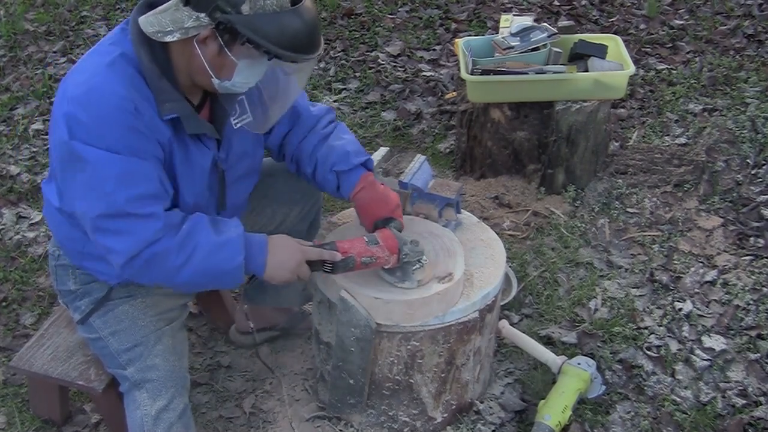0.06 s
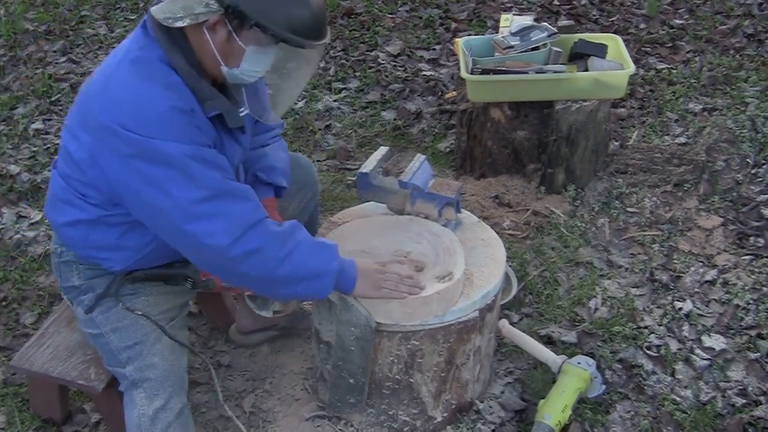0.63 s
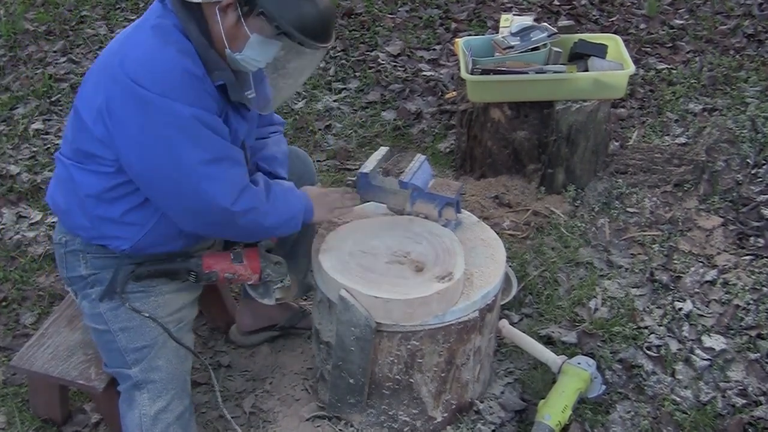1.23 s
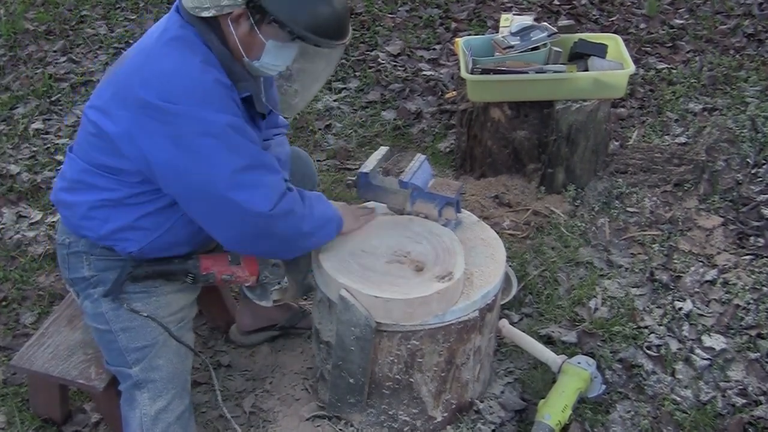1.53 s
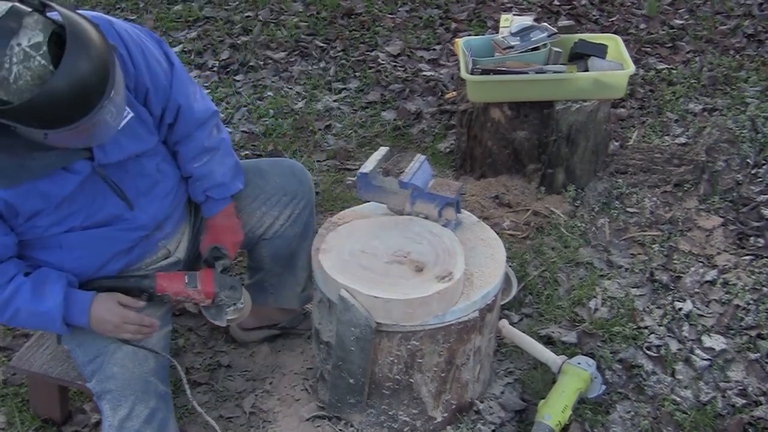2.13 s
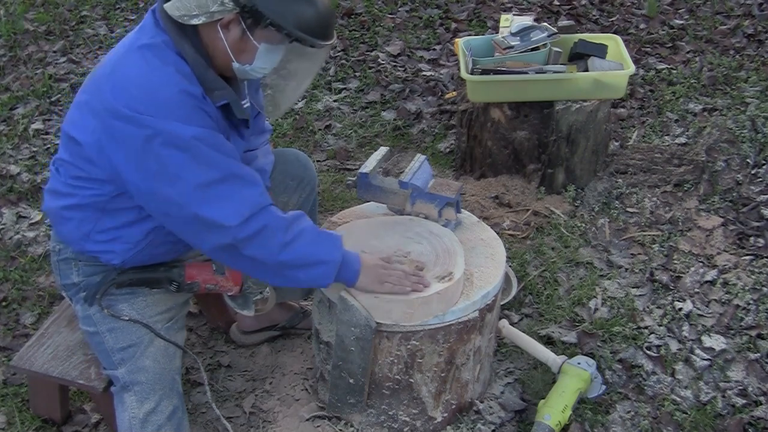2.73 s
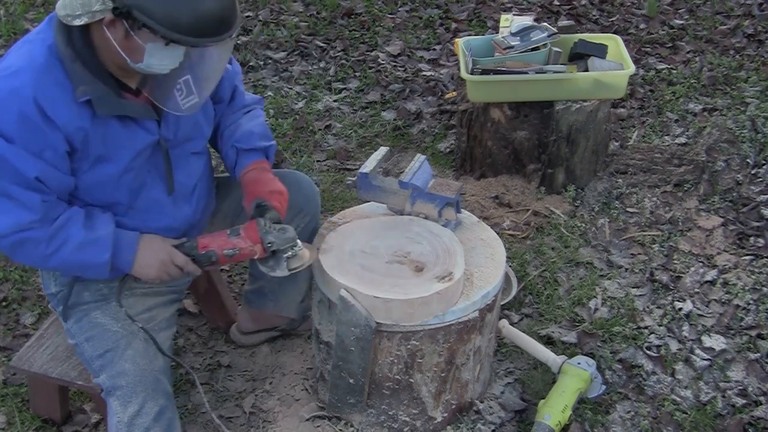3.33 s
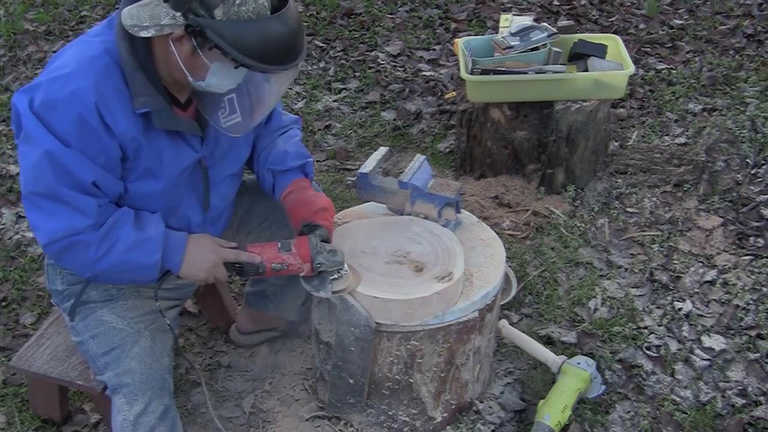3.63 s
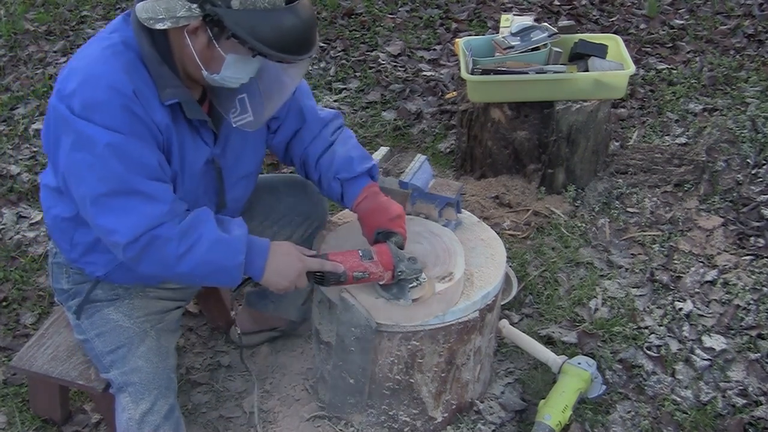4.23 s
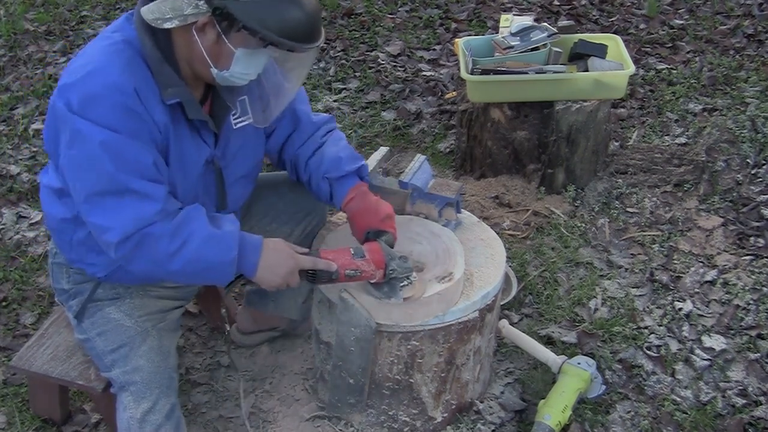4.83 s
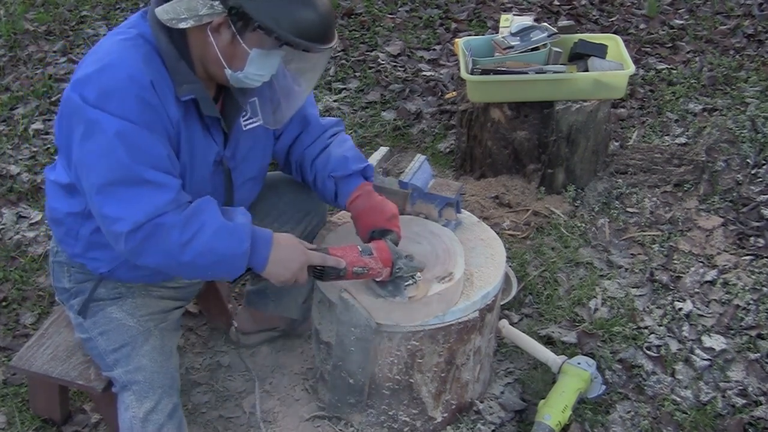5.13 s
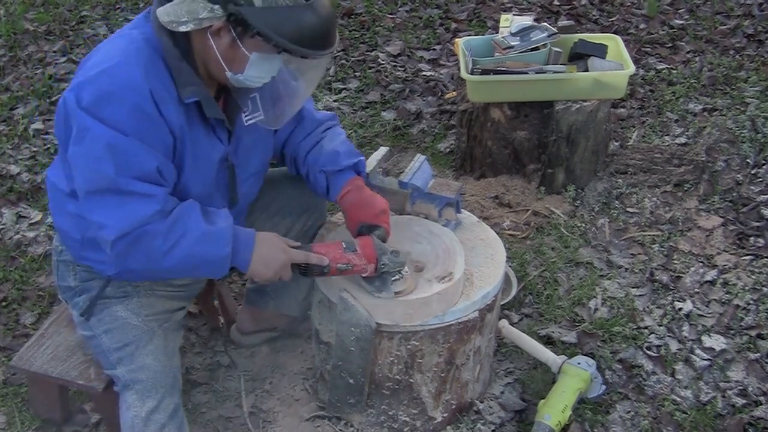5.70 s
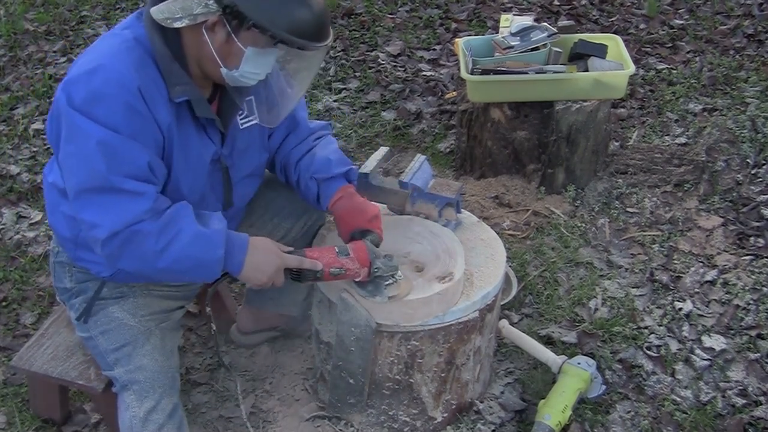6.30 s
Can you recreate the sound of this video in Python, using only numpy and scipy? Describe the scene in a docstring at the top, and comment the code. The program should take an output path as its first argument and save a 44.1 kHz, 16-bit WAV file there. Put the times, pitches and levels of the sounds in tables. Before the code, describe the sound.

Outdoors, a nearby angle grinder rasps harshly against a log, then is switched off almost at once. Its gears rattle and chirp, falling in pitch until it stops, over a faint drone of distant machinery. A hand softly brushes dust from the wood. The grinder restarts with a clack, squeals briefly as it speeds up, and keeps sanding with a hum, a thin whine and high metallic ringing.

```python
"""First you hear the harsh scrape of a corded angle grinder sanding a hollow into a log outdoors.
Grit tears the wood, the steel guard rings, the motor hums and the gears whine; far-off machinery drones.
Switched off, the grinder rattles to a stop as its loose gear teeth knock together.
A hand brushes dust off the log, then the grinder starts with a clack and sands on.
One disc speed drives the hum, the whine and the rattle."""
import sys
import numpy as np
from scipy import signal
from scipy.fft import rfft, irfft
from scipy.io import wavfile
from scipy.ndimage import uniform_filter1d

SR = 44100
rng = np.random.default_rng(int(sys.argv[2]) if len(sys.argv) > 2 else 0)


def put_to_file(sound):
    """Save the sound as 16-bit audio at rate SR, in the file named by the first command-line argument."""
    columns = np.atleast_2d(sound).T  # one column per channel
    safe = np.clip(columns, -1, 1)
    whole_steps = np.round(safe * 32767)
    wavfile.write(sys.argv[1], SR, whole_steps.astype(np.int16))


N = 284886
T = np.arange(N) / SR
OFF_S, STOP_S, ON_S = .405, 2.9, 3.379  # switched off, standing still, switched on
RUN_UP_S, WORK_SPEED = .2, 150  # every disc speed is in turns per second
MOTOR_TEETH, DISC_TEETH, MAINS_HZ = 11, 37, 60


def undb(db):
    """Turn decibels into a gain."""
    return 10 ** (np.asarray(db) / 20)

def curve(rows):
    """Join (time, value) points with straight lines."""
    return np.interp(T, *np.transpose(rows))

def noise():
    """White noise: an even hiss."""
    return rng.standard_normal(N)

def wobble(rate):
    """A smooth random wander of about 1 up or down, turning `rate` times a second."""
    step = max(int(SR / rate), 2)
    return 1.31 * uniform_filter1d(np.repeat(rng.standard_normal(N // step + 1), step), step)[:N]

def unit(x, band=None):
    """Scale to an average strength (rms) of 1, overall or within a band in Hz."""
    part = x if band is None else signal.sosfilt(signal.butter(4, band, "band", fs=SR, output="sos"), x)
    return x / np.sqrt(np.mean(part ** 2))

def colour(x, points, size=2048):
    """Shape bass and treble along (Hz, dB) points."""
    hz, db = np.transpose(points)
    grid = np.maximum(np.fft.rfftfreq(size, 1 / SR), 1)
    cepstrum = irfft(np.log(undb(np.interp(np.log(grid), np.log(hz), db))))
    cepstrum[1:size // 2] *= 2  # folded so that the filter never sounds ahead of its input
    cepstrum[size // 2 + 1:] = 0
    return signal.oaconvolve(x, irfft(np.exp(rfft(cepstrum))))[:N]

def ring(x, modes):
    """Let a sound ring at an object's own pitches."""
    return sum(undb(db) * signal.lfilter(*signal.iirpeak(hz, hz / width, fs=SR), x)
               for hz, width, db in modes)

def fade(x, seconds):
    """Give every kick a dying tail."""
    return signal.lfilter([1], [1, -np.exp(-1 / (seconds * SR))], x)

def smooth(x, seconds):
    """Round off sudden changes."""
    return fade(x, seconds) / (seconds * SR)

def kicks(times, sizes):
    """Clicks one sample long."""
    return np.bincount(np.clip(np.asarray(times) * SR, 0, N - 1).astype(int), sizes, N)

def swell(peak_s, rise_s):
    """One smooth rise and an equally long fall."""
    return np.cos(np.pi / 2 * (T - peak_s) / rise_s) ** 2 * (np.abs(T - peak_s) < rise_s)

def swells(rows):
    """A row of swells, each with its own level."""
    return sum(undb(db) * swell(peak_s, rise_s) for peak_s, rise_s, db in rows)

def tone(cycles):
    """A pure tone of strength 1."""
    return np.sqrt(2) * np.sin(2 * np.pi * (cycles % 1).astype(np.float32))

def follow(speed, db, per_doubling):
    """A gain of `db` at working speed, changing by `per_doubling` dB when the speed doubles."""
    return undb(db + per_doubling * np.log2(np.maximum(speed, 1) / WORK_SPEED))


# The disc slows when pressed into the wood (time [s], speed [turns/s])
FIRST_CUT_SPEED = [(0, 145), (.06, 144), (.14, 142.5), (.36, 140)]
SECOND_CUT_SPEED = [(3.57, 181.5), (3.651, 190.6), (3.741, 191.4), (3.93, 172.5), (4.23, 152.8),
                    (4.57, 157.1), (4.85, 151.8), (4.98, 150.8), (5.18, 139.5), (5.38, 131.6), (5.6, 149.7),
                    (5.691, 152.5), (5.95, 147.3), (6.08, 143.1), (6.2, 145.3), (6.321, 135.2),
                    (6.46, 133.2)]
def disc_speed(power, braking=37, drag_speed=107):
    """Switched off, friction takes `braking` turns/s away each second; air drag equals it at drag_speed."""
    run_up = 1 - (1 - np.clip((T - ON_S) / RUN_UP_S, 0, 1)) ** 1.6
    driven = curve(np.vstack([FIRST_CUT_SPEED, SECOND_CUT_SPEED])) * np.where(T < STOP_S, 1, run_up)
    slowing = drag_speed * np.tan(braking / drag_speed * np.maximum(STOP_S - T, 0))
    return power * driven + (1 - power) * slowing

def disc_buzz(turns, odd_db=-7, smear=.2, multiples=range(13, 64)):
    """The uneven disc touches twice a turn, so even multiples of its speed lead the buzz."""
    return unit(sum(undb(odd_db * (k % 2) + 4 * wobble(40))
                    * tone(k * turns + rng.random() + smear * wobble(45)) for k in multiples))

# How hard the grit bites (time [s], level [dB])
FIRST_BITE = [(0.0, -33), (0.048, -32.5), (0.092, -35.5), (0.39, -34)]
SECOND_BITE = [(3.4, -46), (3.42, -36), (3.57, -33), (3.96, -36), (4.2, -37), (4.33, -33.5), (4.59, -39),
               (4.68, -32), (4.8, -31), (4.84, -38.5), (4.96, -32.5), (5.76, -36.5), (5.79, -32.5),
               (5.96, -40), (6.03, -32), (6.07, -36), (6.43, -35.5), (6.46, -35)]
# Tone colours of rasping wood and hissing grit (pitch [Hz], level [dB])
WOOD_COLOUR = [(100, -41), (300, -29.5), (600, -14.5), (1000, -4), (1500, -2.5), (2100, 0), (2650, -0.5),
               (3300, 1), (4000, 0), (4600, 2), (5500, -9.5), (7500, -2), (9500, -5.5), (16000, -13.5)]
GRIT_COLOUR = [(2000, -26.5), (5000, -9), (7400, -4), (9300, -9), (10300, -1), (11400, 7), (12600, -1.5),
               (13500, 5), (14600, -5), (15700, 3)]
# Where the disc rings (pitch [Hz], width [Hz], level [dB])
DISC_RINGS = [(2130, 110, -2), (3340, 410, -6.5), (4570, 300, -11.5)]
def scrape(speed, contact, buzz):
    """Grains of grit tear at the wood: a rasp with a bright hiss on top."""
    bite_db = curve(np.vstack([FIRST_BITE, SECOND_BITE])) + .98 * wobble(25) - 1
    rasp = colour(contact * noise() + undb(-5) * buzz, WOOD_COLOUR)
    rasp = unit(rasp + ring(rasp, DISC_RINGS), (1200, 5500))
    hiss = unit(colour(contact * noise(), GRIT_COLOUR), (12000, 13600))
    return rasp * undb(bite_db) + hiss * follow(speed, -39, 1.7)

# Where the steel guard rings (pitch [Hz], width [Hz], level [dB])
GUARD_RINGS = [(6000, 60, -33), (6585, 29, -3), (7080, 120, 3), (8175, 72, 6.5)]
# When it sings out (peak time [s], rise [s], level [dB])
GUARD_FLARES = [(0.124, 0.025, -29), (0.218, 0.018, -26), (0.371, 0.051, -32), (3.578, 0.025, -26),
                (3.734, 0.1, -28.5), (3.84, 0.035, -27), (4.263, 0.07, -31.5), (4.68, 0.055, -28.5),
                (5.334, 0.041, -30.3), (5.45, 0.022, -27), (5.556, 0.04, -28), (5.723, 0.036, -27.5),
                (5.79, 0.029, -26.5), (5.853, 0.037, -27.5), (6.033, 0.033, -29), (6.204, 0.038, -28.5),
                (6.3, 0.027, -32), (6.404, 0.025, -27.5)]
def steel_guard(speed, throb, buzz):
    """Shaking rings the guard; the more the wood slows the disc, the more it sings clear tones."""
    singing = undb(-7 - .18 * (speed - WORK_SPEED))
    shaking = (throb * noise() + singing * buzz) / np.sqrt(1 + 2 * singing ** 2)
    ringing = unit(ring(shaking * undb(3.5 * wobble(60)), GUARD_RINGS))
    # its clamp holds back the widest swings
    clamped = unit(ringing / np.sqrt(1 + uniform_filter1d(ringing ** 2, size=400)))
    return clamped * np.hypot(follow(speed, -39, -3.9), undb(-3.5) * swells(GUARD_FLARES))

# Where the gear case rings (pitch [Hz], width [Hz], level [dB])
CASE_RINGS = [(14150, 70, 3), (14270, 110, 4), (14570, 160, -3), (14900, 250, -11), (15700, 160, -8)]
# When it rings out (peak time [s], rise [s], level [dB])
CASE_FLARES = [(0.139, 0.034, -31), (0.351, 0.028, -28), (4.852, 0.061, -35), (5.038, 0.037, -40),
               (5.374, 0.044, -28), (5.435, 0.021, -31.0), (5.643, 0.025, -34.5), (5.93, 0.08, -30),
               (6.0, 0.023, -28.6), (6.123, 0.042, -28), (6.304, 0.047, -32.6)]
def gear_case(speed):
    """The shaken gear case rings very high."""
    ringing = unit(ring(noise() * undb(2 * wobble(40)), CASE_RINGS))
    return ringing * np.hypot(follow(speed, -33.5, 4.6), undb(1) * swells(CASE_FLARES))

def grinding(turns, speed):
    """The disc throbs against the wood twice a turn and shakes the tool."""
    flutter = 1 + .2 * np.cos(2 * np.pi * 6 * MAINS_HZ * T)
    throb = (1 + .1 * np.cos(4 * np.pi * turns)) * flutter
    contact = unit(throb * undb(3 * wobble(2500) + 1.42 * wobble(70)))
    buzz = disc_buzz(turns)
    return scrape(speed, contact, buzz) + steel_guard(speed, throb, buzz) + gear_case(speed)

# The disc's hum (multiple of disc speed, level [dB])
HUM_TONES = [(2, -70.5), (4, -60.5), (6, -59.5), (8, -54), (9, -70), (10, -57.5), (11, -86), (12, -57),
             (14, -57.5), (16, -61)]
# Where the handle rings (pitch [Hz], width [Hz], level [dB])
HANDLE_RINGS = [(615, 70, -6)]
def disc_hum(turns):
    """The spinning disc hums, and the handle rings along."""
    hum = sum(undb(db + 4 * wobble(24)) * tone(k * turns + .11 * wobble(60)) for k, db in HUM_TONES)
    return undb(-1.5) * (hum + ring(hum, HANDLE_RINGS))

# The gears' whine (multiple of disc speed, level [dB])
WHINE_TONES = [(54, -58), (72, -46), (74, -35), (76, -38)]
# The ringing it glides through (pitch [Hz], width [Hz], level [dB])
WHINE_RINGS = [(11160, 660, -6)]
def gear_whine(turns, speed):
    """The gear teeth make a thin whine that weakens as the disc slows."""
    teeth = sum(undb(db + 3 * wobble(25)) * tone(k * turns + .12 * wobble(150)) for k, db in WHINE_TONES)
    speed_db = .38 * np.clip(speed - WORK_SPEED, -30, 12)
    return (undb(-11) * teeth + ring(teeth, WHINE_RINGS)) * undb(speed_db)

# Bright tones of the disc running almost free (multiple of disc speed, level [dB])
FREE_TONES = [(10, -43.5), (12, -47), (20, -52), (32, -47), (36, -44), (44, -55)]
def motor(turns, speed, free_speed=189.5):
    """The motor drives hum and whine; bright tones join them when the disc spins fast."""
    hum = disc_hum(turns)
    bright = sum(undb(db + 3 * wobble(20)) * tone(round(k) * turns + .1 * wobble(60))
                 for k, db in FREE_TONES)
    bright *= undb(.36 * np.minimum(speed - free_speed, 0))
    rotor_db = -55 + .2613 * (speed - WORK_SPEED) + 2 * wobble(20)
    rotor = undb(rotor_db) * tone(2 * turns * DISC_TEETH / MOTOR_TEETH + .05 * wobble(50))
    spun_up = np.where(T < STOP_S, 1, np.clip((T - ON_S) / RUN_UP_S, 0, 1) ** 3)
    return (hum + gear_whine(turns, speed)) * spun_up + bright + rotor

# Far machinery: the colour of its low rush, and its tones (pitch [Hz], level [dB])
RUSH_COLOUR = [(18, -74), (30, -44), (129, -31), (185, -13.5), (267, -13.5), (364, -7), (415, -15),
               (448, -7), (735, -17.5), (1340, -23.5), (1780, -20.5), (1970, -21.5), (2770, -14),
               (5440, -17.5), (15000, -38)]
DRONE_TONES = [(193.8, -80), (376.8, -68.5), (452.2, -73.5)]
def far_machinery(power, sink_db=-11.5):
    """A distant rush with wavering tones; its level sinks while the grinder runs."""
    middle, *sides = [unit(colour(noise(), RUSH_COLOUR), (150, 900)) * undb(-58.5 + wobble(6.24))
                      for _ in range(3)]
    drone = sum(undb(db + 2.5 + 1.945 * wobble(3.7)) * tone(hz * T + .2 * wobble(8))
                for hz, db in DRONE_TONES)
    return (middle + drone + undb(-12) * np.array(sides)) * undb(sink_db * smooth(power, .038))

# When the disc judders (peak time [s], rise [s], level [dB])
JUDDERS = [(0.04, .07, -36.5), (5.1, .14, -39.5), (5.45, .11, -41), (5.64, .09, -46.5), (5.81, .08, -42.5)]
# The middle tones that stand out (pitch [Hz], width [Hz], level [dB])
JUDDER_RINGS = [(1490, 400, -2), (2120, 730, 0)]
def judder(turns):
    """Pressed hard, the disc bumps against the wood and drones for a moment."""
    bumps = disc_buzz(turns, odd_db=-19, smear=.16, multiples=range(10, 21))
    return unit(ring(bumps, JUDDER_RINGS)) * swells(JUDDERS)

# Squeals of disc and guard (peak time [s], rise [s], pitch [Hz], wobble rate [Hz], level [dB])
SQUEALS = [(0.042, 0.018, 3240, 149, -31), (0.117, 0.028, 8180, 100, -32), (3.393, 0.018, 3020, 805, -31.5),
           (3.45, 0.085, 5130, 798, -30), (3.442, 0.055, 7450, 709, -28.5),
           (3.557, 0.01, 5980, 298.7, -26.5), (5.054, 0.25, 3220, 400, -41)]
def squeals():
    """The disc catches and one rough tone flares up."""
    return sum(undb(db) * swell(peak_s, rise_s) * tone(hz * T + .28 * wobble(rate))
               * undb(2 * wobble(rate)) for peak_s, rise_s, hz, rate, db in SQUEALS)

# Slower gears knock more often each turn (below this speed [turns/s], knocks per turn, level [dB])
RATTLE_STAGES = [(200, 1, 0.5), (61, 2, 0), (44, 2, -4), (31, 7, -8.5)]
# The hardest knocks (time [s], level [dB])
HARD_KNOCKS = [(0.6577, -22), (0.6919, -21), (0.7696, -21), (1.043, -18), (1.0644, -18), (1.396, -24.5),
               (1.515, -25), (1.7641, -24.5)]
def knock_force(turns, speed, rebound_count=14, knock_s=.0014, rise_s=.0003):
    """How hard the loose gear teeth hit each other, moment by moment."""
    below, per_turn, stage_db = np.transpose(RATTLE_STAGES)
    stage = (speed[:, None] < below[1:]).sum(axis=1)
    beats = np.cumsum(np.gradient(turns) * np.round(per_turn)[stage])
    times = T[1:][np.diff(np.floor(beats + .04 * wobble(60))) > 0]
    # now and then a tooth bounces back between two knocks
    halfway = times[:-1] + np.diff(times) / 2
    early = (times[:-1] > OFF_S) & (times[:-1] < 1.4)
    times = np.concatenate([times, rng.choice(halfway[early], size=rebound_count, replace=False)])
    # each hard knock sounds alone, with no lighter knock just before or after it
    hard_s, hard_db = np.transpose(HARD_KNOCKS)
    times = times[np.abs(times[:, None] - hard_s).min(axis=1) > .008]
    strength = follow(speed, -31.5, 1.4) * undb(stage_db[stage])
    sizes = np.interp(times, T, strength) * undb(1.3 * rng.standard_normal(len(times)))
    hits = kicks(times, sizes) + kicks(hard_s, undb(hard_db - 6))
    return smooth(fade(hits, knock_s), rise_s)

# Tone colour of the rattling gears (pitch [Hz], level [dB])
GEAR_COLOUR = [(300, -23), (1500, -8), (3200, -11.5), (4100, -34.5), (5000, 1), (5800, -11.5), (7300, 6),
               (8700, -6.5), (9900, -9.5), (11500, 0.5), (12500, -5), (14400, 5), (15800, -10.5)]
def gear_rattle(speed, force):
    """Each knock bursts out of a steady gear noise and rings the case."""
    clatter = unit(colour(noise(), GEAR_COLOUR), (6000, 13000)) * (force + follow(speed, -35.5, 15.6))
    return clatter + undb(-8) * force * unit(ring(noise(), CASE_RINGS))

# Lower pitches at which the case rings (pitch [Hz], width [Hz], level [dB])
CHIRP_RINGS = [(3030, 360, 1), (5080, 490, -0.5), (6670, 340, -0.5), (7540, 600, -3.5)]
def tooth_chirps(turns, speed, force):
    """Each knock joins the teeth briefly; their falling tone swells wherever the case rings."""
    cycles = 2 * DISC_TEETH * turns + .23 * wobble(700)
    teeth = tone(cycles) + undb(-6) * tone(2 * cycles)
    chirps = teeth * smooth(force, .00037) * follow(speed, 8.3, 4.2)
    return .11 * chirps + ring(chirps, CHIRP_RINGS)

# Tone colour of bearings and fan (pitch [Hz], level [dB])
BEARING_COLOUR = [(200, -18), (700, 2), (1500, -8), (2100, -1.5), (2500, -3), (3100, 7), (4100, 0.5),
                  (5000, 2), (5800, -3), (7100, -6), (9500, -8), (13500, -22), (16000, -21)]
# Where the idling gears ring (pitch [Hz], width [Hz], level [dB])
IDLE_RINGS = [(6550, 60, -3), (11650, 160, -7), (14230, 350, 0)]
def coasting(turns, speed, crawl_speed=18):
    """With the power off, gears rattle, bearings rub, the fan runs out and the motor's tones fall."""
    force = knock_force(turns, speed)
    knocks = gear_rattle(speed, force) + tooth_chirps(turns, speed, force)
    bearing_gain, fan_gain = follow(speed, -53, -.59), follow(speed, -36.5, 20.5)
    rub = unit(colour(noise() * undb(2 * wobble(200)), BEARING_COLOUR), (1500, 4500))
    rub *= np.hypot(bearing_gain, fan_gain)
    whoosh = unit(colour(noise(), RUSH_COLOUR), (150, 900)) * follow(speed, -47.5, 18.4)
    gears = unit(ring(noise() * undb(2 * wobble(150)), IDLE_RINGS)) * follow(speed, -45, 1.52)
    motor_turns = turns * DISC_TEETH / MOTOR_TEETH
    rotor = undb(-49 + 2 * wobble(58.6)) * swell(.53, .27) * tone(2 * motor_turns + .053 * wobble(80))
    whistle = undb(-54) * swell(1.15, .62) * tone(48 * motor_turns)  # the motor's sliding contacts
    dying_away = np.clip(speed / crawl_speed, 0, 1) ** .64
    return (knocks + rub + whoosh + gears + rotor + whistle) * dying_away

# Strokes of the hand (peak time [s], length [s], level [dB])
HAND_STROKES = [(3.036, 0.058, -57), (3.166, 0.073, -56), (3.227, 0.094, -54.5)]
def hand():
    """A palm wipes sawdust from the log with a soft swish."""
    swish = unit(colour(noise(), [(300, -12), (1200, 6), (5000, -1), (14000, -5)]))
    return swish * sum(undb(db) * swell(peak_s, length / 2) for peak_s, length, db in HAND_STROKES)

def start_clack(level_db=-19, decay_s=.002):
    """The motor jerks and the gear teeth slam together."""
    burst = unit(colour(noise(), WOOD_COLOUR) + colour(noise(), GEAR_COLOUR))
    return undb(level_db) * fade(kicks([ON_S], [1.]), decay_s) * burst

# Tone colour of the sound scattered sideways (pitch [Hz], level [dB])
SCATTER_COLOUR = [(200, -5.5), (1000, -10), (2200, -20), (4500, -30.5), (8000, -14), (14000, -11)]
def outdoors(x, decay_s=.078, echo_db=-12, size=8192):
    """Ground and trees send back a short blurred echo that differs left and right."""
    tails = rng.standard_normal((2, size)) * np.exp(-T[:size] / decay_s)
    middle, side = (signal.oaconvolve(x, tail / np.linalg.norm(tail))[:N] for tail in tails)
    return x + undb(echo_db) * middle + colour(side, SCATTER_COLOUR) * np.array([[1], [-1]])

def scene(release_s=.035, lean_left_db=.57):
    """The switch hands the sound over between grinding and coasting."""
    power = np.maximum(np.clip((OFF_S - T) / release_s + .5, 0, 1), T > ON_S)  # 1 is on, 0 is off
    speed = disc_speed(power)
    turns = np.cumsum(speed * (1 + .00155 * wobble(30))) / SR
    working = grinding(turns, speed) + judder(turns) + motor(turns, speed) + squeals()
    grinder = power * working + np.sqrt(1 - power ** 2) * coasting(turns, speed)
    near = outdoors(grinder + start_clack() + hand())
    balance = undb(np.array([[lean_left_db], [-lean_left_db]]) / 2)
    return near * balance + far_machinery(power)

# Lowish sound that comes mostly from the right (pitch [Hz], width [Hz], level [dB])
RIGHT_BAND = [(473, 890, -8)]
def record(dry, top_hz=15850):
    """The lower middle pitches lean to the right, and the highest treble is cut."""
    tilted = dry + ring(dry.mean(axis=0), RIGHT_BAND) * np.array([[-1], [1]])
    return signal.sosfilt(signal.ellip(12, .1, 80, top_hz, fs=SR, output="sos"), tilted)


dry = scene()
out = record(dry)
put_to_file(out)
```